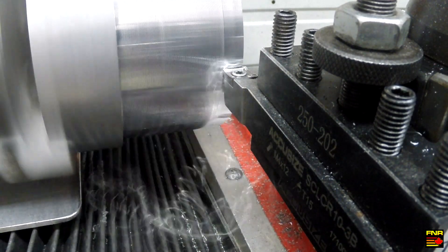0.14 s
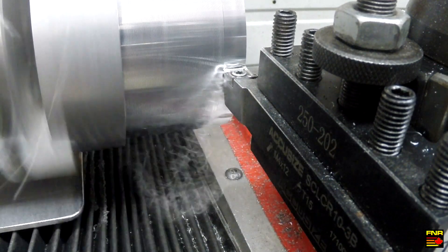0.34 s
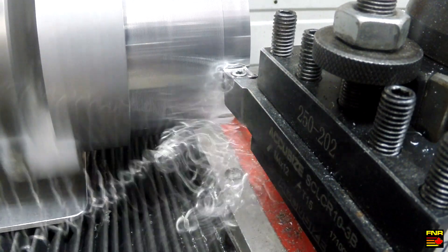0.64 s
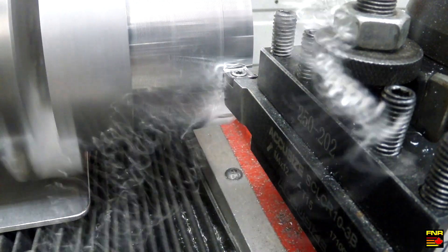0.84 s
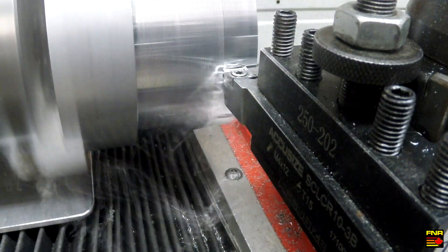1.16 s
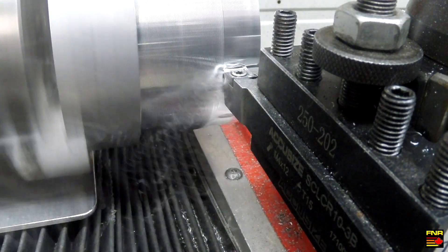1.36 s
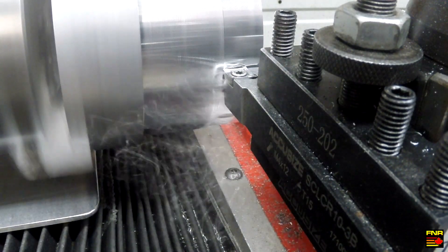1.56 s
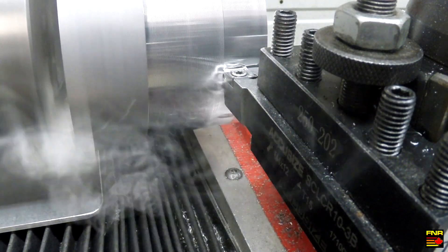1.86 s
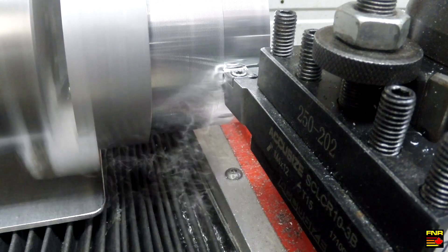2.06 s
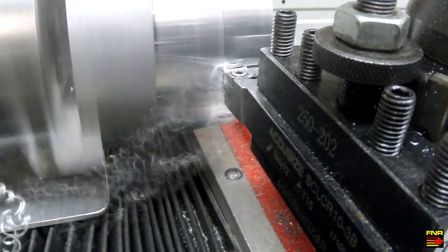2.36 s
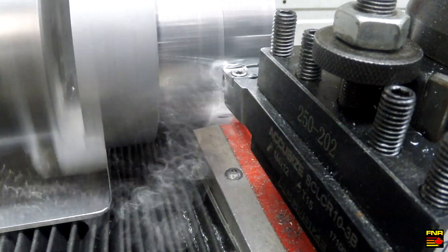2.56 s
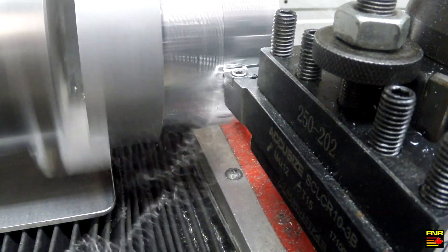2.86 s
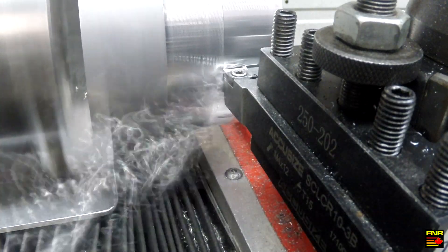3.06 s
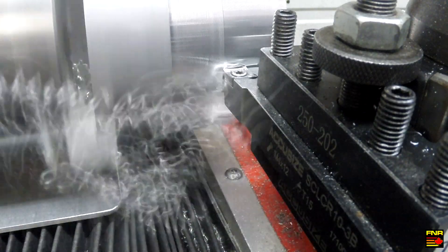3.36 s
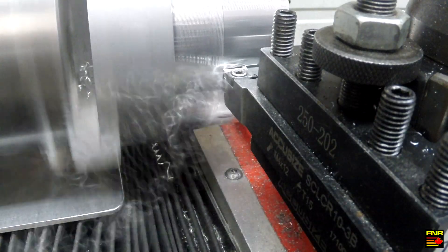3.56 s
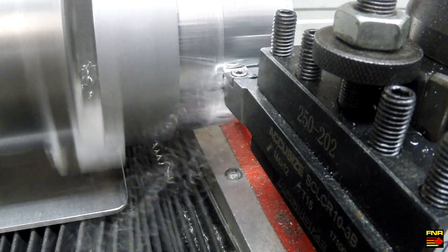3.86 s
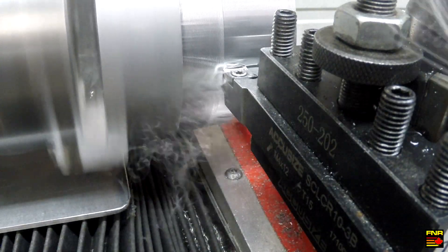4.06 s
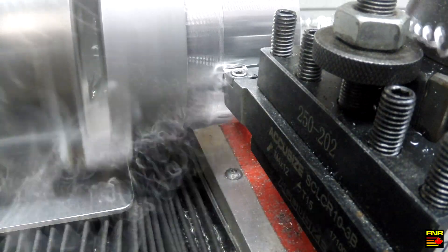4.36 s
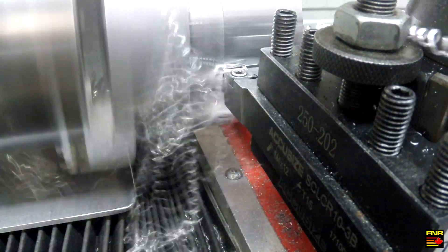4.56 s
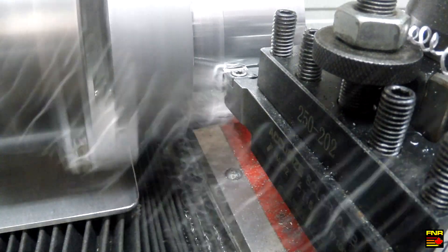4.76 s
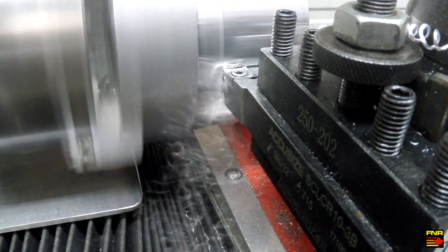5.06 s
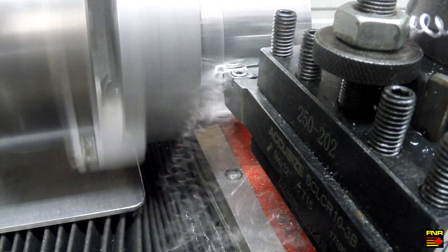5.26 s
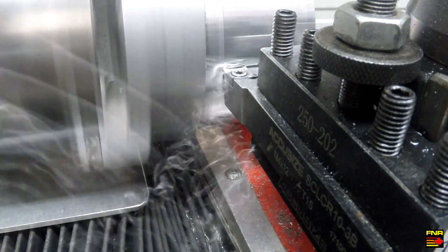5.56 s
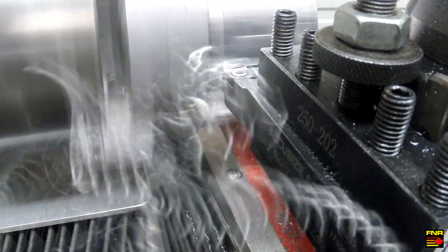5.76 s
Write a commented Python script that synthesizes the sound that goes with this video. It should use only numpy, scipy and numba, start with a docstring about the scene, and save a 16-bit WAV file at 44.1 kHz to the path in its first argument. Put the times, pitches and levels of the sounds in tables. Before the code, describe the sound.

Close, continuous rasping of a tool shaving metal over a low machine hum, scattered hard clicks, and a heavier bite at the end.

```python
"""A lathe turns a metal cylinder in a workshop, heard from close by.
From the start the shearing chip shakes bed, tool post and insert (noise through resonances) over a sine hum.
Soon the curling chip rasps as it catches, a deep throb swells, and loose swarf brushes by as filtered prickle.
From 1.4 s to 5 s flying chips tick sharply (scrape, clatter, two rings); a limiter ducks the machine
after the hard ones. In the last second the cut bears down harder."""
import sys
import numpy as np
from scipy import signal
from scipy.fft import rfft, irfft
from scipy.io import wavfile
from scipy.ndimage import uniform_filter1d
from numba import njit

SR = 44100
rng = np.random.default_rng(int(sys.argv[2]) if len(sys.argv) > 2 else 0)


def unload_wav(signal):
    """Save mono or channel-first audio to the path in sys.argv[1] as 16-bit WAV at rate SR, clipped to [-1, 1]."""
    wavfile.write(
        sys.argv[1],
        SR,
        np.round(np.clip(np.atleast_2d(signal).T, -1, 1) * 32767).astype(np.int16),
    )


N = 261072
T = np.arange(N) / SR  # time, s


def amp(db):
    """Decibels to gain."""
    return 10 ** (np.asarray(db) / 20)


def unit(x):
    """Scales to an rms of one."""
    return x / np.sqrt(np.mean(x ** 2) + 1e-20)


def wander(rate_hz):
    """Slow random drift of rms one, with little above the given rate."""
    hz = np.fft.rfftfreq(N, 1 / SR)
    spectrum = rfft(rng.standard_normal(N))
    return unit(irfft(spectrum / (1 + (hz / rate_hz) ** 2), N))


def swells(rows, attack_s, release_s):
    """Each row of (start s, length s, dB) moves the level, holds and lets it return; the sum in dB."""
    total_db = 0
    for start, length, db in rows:
        rise = (T - start) / attack_s
        fall = 1 - (T - start - length) / release_s
        total_db = total_db + db * np.clip(np.minimum(rise, fall), 0, 1)
    return total_db


def colour(x, gain_at, size=16384):
    """Causal (minimum-phase) filter with the given gain at each frequency: it rings only after a blow."""
    log_gain = np.log(gain_at(abs(np.fft.fftfreq(size, 1 / SR))) + 1e-8)
    response = np.fft.ifft(np.exp(np.conj(signal.hilbert(log_gain)))).real
    return signal.fftconvolve(x, response[:size // 2])[:len(x)]


def ring(x, modes, count=8192):
    """Passes x through a part's steep-sided resonances, already ringing at the start; rms one."""
    centre, width, db = np.transpose(modes)[:, :, None]

    def gain_at(hz):
        detune = 2 * (hz - centre) / width
        power = amp(db) ** 2 / (1 + detune ** 2 / 3) ** 3
        return np.sqrt(power.sum(0))

    warmed_up = np.r_[x[-count:], x]
    return unit(colour(warmed_up, gain_at)[count:])


def fractures(per_s, spread_db, smooth):
    """Metal shears off in tiny segments of uneven size, over smooth sliding friction."""
    sizes = amp(abs(spread_db) * np.minimum(rng.exponential(1, N), 4))
    slips = sizes * rng.choice([-1, 1], N) * (rng.random(N) < per_s / SR)
    return unit(unit(slips) + smooth * rng.standard_normal(N))


# resonances of the machine bed, the tool post and the cutting insert: f/Hz, width/Hz, relative level/dB
BED_MODES = [(32.2, 11, -61), (82.6, 13, -54), (115.3, 15, -45), (160.2, 7.4, -38), (187.4, 48, -47.5),
             (313.4, 72, -51.5), (377.6, 27.2, -45.5), (517.2, 42.4, -61)]
POST_MODES = [(760.7, 64, -52.5), (952, 55.5, -50), (1012, 29.6, -52.5), (1209.5, 20, -58),
              (1140, 850, -66.5), (1554.5, 140, -53), (1692, 30, -55.5), (2082, 104, -60),
              (2308, 114, -55.5)]
INSERT_MODES = [(3330, 1160, -74), (3456, 94, -59), (3870, 270, -64), (4422, 191, -56.5), (4890, 250, -60),
                (5426, 174, -70), (6020, 136, -76), (6546, 230, -69), (6970, 160, -90), (7950, 280, -92),
                (8880, 330, -91.5), (10200, 340, -95), (10569.0, 1800, -104.2), (14179.0, 550, -106.8)]
# how hard the tool is cutting, against its usual effort: t/s, level/dB
CUT_EFFORT = [(0.0, -1), (0.4, 0.7), (0.68, -0.5), (0.8, 4), (1.05, 2.5), (1.38, 6.5), (1.5, -2.3),
              (2.2, 1.5), (2.62, -1.3), (3.25, 0.4), (3.55, -0.5), (4.0, -1), (4.33, 2.5), (4.55, -2),
              (5.0, 0.2), (5.5, 3), (5.92, 4)]
# the curling chip catches on the insert, rasps and lets go: start t/s, length t/s, rise in level/dB
CHIP_CATCHES = [(0.131, 0.03, 3.5), (0.23, 0.054, 3), (0.345, 0.058, 3.5), (0.60, 0.054, 4.5),
                (0.72, 0.07, 2.5), (0.82, 0.056, 2.5), (0.96, 0.045, 4), (1.10, 0.089, 3),
                (2.10, 0.064, 2.5), (2.73, 0.032, 5), (3.72, 0.084, 4), (4.11, 0.02, 4.5), (4.80, 0.036, 3),
                (5.18, 0.05, 1), (5.73, 0.053, 2.5)]
# the chip breaks off, the rasp sinks until a new curl forms: start t/s, length t/s, change in level/dB
CHIP_BREAKS = [(0.519, 0.052, -3), (1.042, 0.036, -3.5), (2.033, 0.06, -0.5), (2.246, 0.033, -4.5),
               (3.433, 0.023, -5.5), (4.467, 0.032, -5)]
BED_DB, POST_DB, INSERT_DB = -23.5, -26, -31  # levels at the usual effort
POST_FOLLOWS, INSERT_FOLLOWS = 0.78, 0.78  # share of a change in effort (in dB) that each part follows
CATCH_ATTACK_S, CATCH_RELEASE_S = 0.005, 0.011
POST_CATCH_SHARE = 0.66  # how much of the chip's rasp (in dB) reaches the tool post
FLUTTER_DB, FLUTTER_HZ = 1.68, 25  # smaller catches and breaks, at random


def cutting():
    """One unsteady force drives three parts: the bed follows the effort, the light insert also the catches."""
    force = fractures(per_s=3500, spread_db=3.0, smooth=1.0)
    judder = wander(rate_hz=350)
    effort_db = np.interp(T, *np.transpose(CUT_EFFORT))
    rasp_db = swells(CHIP_CATCHES + CHIP_BREAKS, CATCH_ATTACK_S, CATCH_RELEASE_S)
    rasp_db = rasp_db + FLUTTER_DB * wander(FLUTTER_HZ)

    # the judder depths are in dB
    bed = ring(force * amp(0.25 * judder), BED_MODES)
    post = ring(force * amp(1.86 * judder), POST_MODES)
    insert_judder_db = 1.05 * judder + 1.45 * wander(rate_hz=170)
    insert = ring(force * amp(insert_judder_db), INSERT_MODES)

    bed_db = BED_DB + effort_db
    post_db = POST_DB + POST_FOLLOWS * effort_db + POST_CATCH_SHARE * rasp_db
    insert_db = INSERT_DB + INSERT_FOLLOWS * effort_db + rasp_db
    return amp(bed_db) * bed + amp(post_db) * post + amp(insert_db) * insert


ONSET_MS = 0.14  # time constant of a strike's rise


def mode(hz, t60_ms, contact_ms, ms, rattle=0.032):
    """A ring that decays from half-way through the contact; rattling jolts its phase and widens it."""
    decay = amp(-60 * np.maximum(ms - contact_ms / 2, 0) / t60_ms)
    swell = (1 - np.exp(-ms / ONSET_MS)) * decay
    jolts = np.cumsum(rng.standard_normal(len(ms))) * rattle * np.sqrt(hz / 6000)
    return swell * np.sin(2 * np.pi * (hz * ms / 1000 + rng.random()) + jolts)


# chips that strike: t/s, relative level/dB, scrape length t/ms, low ring f/Hz, its 60 dB decay t/ms,
# high ring f/Hz, brightness level/dB (lifts the scrape and, in proportion to pitch, the high ring)
CHIP_STRIKES = [ (1.4220, -3.5, 0.71, 2070, 31, 4940, -4.5), (1.4551, -4, 0.6, 2450, 12, 6600, 2),
                (1.4691, 2, 1.02, 1790, 11, 4180, -10.5), (1.4902, -10.5, 12, 967, 62, 12100, -24),
                (1.5682, -10, 3.6, 1090, 16, 2310, -30), (1.9581, 5, 2.66, 2248, 19, 3710, -6.5),
                (2.3640, -15.5, 1.9, 2640, 8.5, 7870, 5), (2.3963, -12, 4.1, 1930, 11, 8000, -0.5),
                (2.4285, -9.5, 4.2, 2310, 33, 10500, -28), (2.7265, -5, 2.5, 1513, 42, 2190, -33),
                (2.879, -6.5, 1.4, 980, 29, 11800, -13), (3.3855, -16, 2.7, 1950, 12, 6550, -9),
                (3.3950, -14.5, 3.9, 2330, 11, 5400, 0.5), (3.4016, -7, 3.3, 2750, 12, 9300, -12),
                (3.4143, -13, 2.2, 1820, 9.3, 6640, -6), (3.8532, -8.5, 2.8, 2010, 7.5, 3170, 2),
                (4.4440, -16, 7, 2256, 50, 8200, -25), (4.4590, -11, 0.44, 1900, 16, 9500, 1),
                (4.5725, -4, 1.32, 3780, 21, 8330, -7), (4.9478, -12, 2.6, 2110, 17, 12600, -19), ]
# colour of a chip's scrape: f/Hz, relative level/dB
SCRAPE_COLOUR = [(300, -15), (1000, 1.5), (2000, 1), (4800, 0.5), (5800, -1.5), (8500, -9.5), (11000, -13),
                 (13500, -26), (15500, -44)]
# the duller clatter of a whole chip: f/Hz, width/Hz, relative level/dB
CLATTER_MODES = [(1340, 73, -0.5), (2140, 390, 0.5), (3270, 1740, -13.5)]
CLATTER_DB, CLATTER_BUILD_MS = -3, 1.8  # a longer contact clatters more
CLATTER_DB_PER_RING_MS = -0.2032  # a chip that rings freely clatters less
BRIGHT_HZ = 9400  # pitch at which the high ring takes on exactly the brightness


def chips(size=2600):
    """Each chip scrapes against the metal, clatters, and rings at two pitches of its own."""
    out = np.zeros(N + size)
    ms = np.arange(size) * 1000 / SR
    onset = 1 - np.exp(-ms / ONSET_MS)
    scrape_hz, scrape_db = np.transpose(SCRAPE_COLOUR)

    def scrape_gain(hz):
        return amp(np.interp(np.log(hz + 1), np.log(scrape_hz), scrape_db))

    grit = unit(colour(rng.standard_normal(N + size), scrape_gain))
    clatter = ring(rng.standard_normal(N + size), CLATTER_MODES)
    for s, db, contact_ms, low_hz, low_ms, high_hz, bright_db in CHIP_STRIKES:
        start = round(s * SR)
        span = slice(start, start + size)
        after_ms = np.maximum(ms - contact_ms, 0)
        scrape = amp(bright_db - 3.5) * grit[span] * onset * np.exp(-after_ms / 1.45)
        clatter_gain = amp(CLATTER_DB + CLATTER_DB_PER_RING_MS * low_ms)
        clatter_gain = clatter_gain * np.tanh(contact_ms / CLATTER_BUILD_MS)
        dull = clatter_gain * clatter[span] * onset * amp(-60 * after_ms / low_ms)
        low = amp(-3.5) * mode(low_hz, low_ms, contact_ms, ms)
        high_db = bright_db * high_hz / BRIGHT_HZ - 5.0
        high = amp(high_db) * mode(high_hz, 15.0, contact_ms, ms)
        out[span] += amp(db) * (scrape + dull + low + high)
    return out[:N]


# loose swarf brushing the work: t/s at its strongest, level/dB above which the steady prickle adds,
# half-length t/s (to 1/e)
SWARF_BRUSHES = [(0.363, -55, 0.027), (0.568, -51, .03), (1.257, -43, 0.021), (1.366, -64, 0.044),
                 (1.793, -57, 0.013), (2.685, -56, 0.037), (3.23, -55, 0.025), (5.096, -59, 0.014),
                 (5.76, -67, 0.062)]


def swarf():
    """Loose curls of swarf prickle faintly all along and now and then brush the work."""
    brushing = sum(amp(db) * np.exp(-((T - s) / length) ** 2) for s, db, length in SWARF_BRUSHES)
    prickle = fractures(per_s=470, spread_db=2.0, smooth=1.0)
    prickle = prickle * amp(6.9 * np.tanh(wander(rate_hz=35)))
    # f/Hz, width/Hz, relative level/dB
    curl_modes = [(8360, 1440, 4.5), (10300, 1000, -4), (13700, 1800, -11.5)]
    return (amp(-63) + brushing) * ring(prickle, curl_modes)


# motor hum on the mains harmonics and a thin drive whine: f/Hz, relative level/dB
MOTOR_HUM = [(120, -38), (240.2, -30.5), (360.2, -45.5), (480.2, -78.5), (600.3, -54), (1272, -63)]
# a deep rumble swells now and then: start t/s, length t/s, rise in level/dB
RUMBLE_SWELLS = [(0.25, 0.93, 5), (2.0, 0.51, 10), (4.55, 0.22, 10)]
RUMBLE_DB, RUMBLE_ATTACK_S, RUMBLE_RELEASE_S = -41.5, 0.093, 0.15


def motor():
    """Steady sine hum that wavers a little in level and phase, over an unsteady low throb."""
    hum = 0
    for hz, db in MOTOR_HUM:
        level = amp(db + 1.0 * wander(rate_hz=24.0))
        hum = hum + level * np.sin(2 * np.pi * hz * T + 0.043 * wander(rate_hz=18.0))
    throb = np.sin(2 * np.pi * 32.3 * T + 1.3 * wander(rate_hz=5.0))
    throb_db = RUMBLE_DB + swells(RUMBLE_SWELLS, RUMBLE_ATTACK_S, RUMBLE_RELEASE_S)
    throb_db = throb_db + 3.2 * wander(rate_hz=5.4)
    return amp(1.5) * hum + amp(throb_db) * throb


def scene():
    """Everything as it reaches the microphone."""
    return (cutting() + chips() + swarf() + motor())[None]


@njit
def recover(over, keep):
    """Holds each peak and lets it fade by a fixed share a sample."""
    held = over.copy()
    for i in range(1, len(held)):
        held[i] = max(over[i], held[i - 1] * keep)
    return held


def limiter(x, threshold_db, recovery_s, attack_s, size=90):
    """Turns down quickly when the short-term power is over the threshold, and comes back slowly."""
    power_db = 10 * np.log10(abs(uniform_filter1d(x ** 2, size)) + 1e-12)
    over_db = np.maximum(power_db - threshold_db, 0)
    cut_db = recover(over_db, np.exp(-1 / (recovery_s * SR)))
    lag = np.exp(-1 / (attack_s * SR))
    smooth_cut_db = signal.lfilter([1 - lag], [1, -lag], cut_db)
    return x * amp(-smooth_cut_db)


def record(dry):
    """The microphone's limiter, soft overload and upper band limit."""
    x = limiter(dry[0], threshold_db=-12.0, recovery_s=0.32, attack_s=0.0018)
    ceiling = 0.59
    x = x / (1 + (x / ceiling) ** 6) ** (1 / 6)
    low_pass = signal.firwin(301, 15250, window=("kaiser", 9), fs=SR)  # cutoff in Hz
    return signal.oaconvolve(x, low_pass, "same")[None]


dry = scene()
out = record(dry)
unload_wav(out)
```